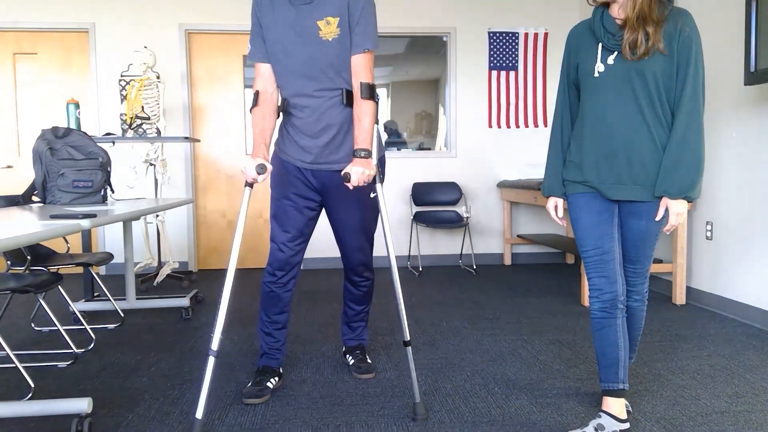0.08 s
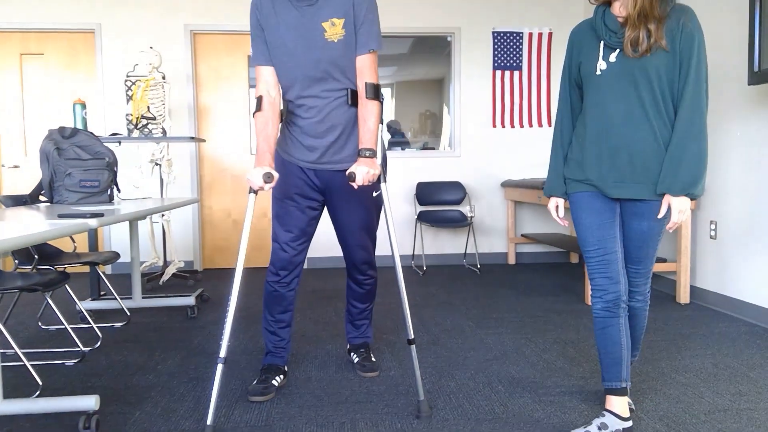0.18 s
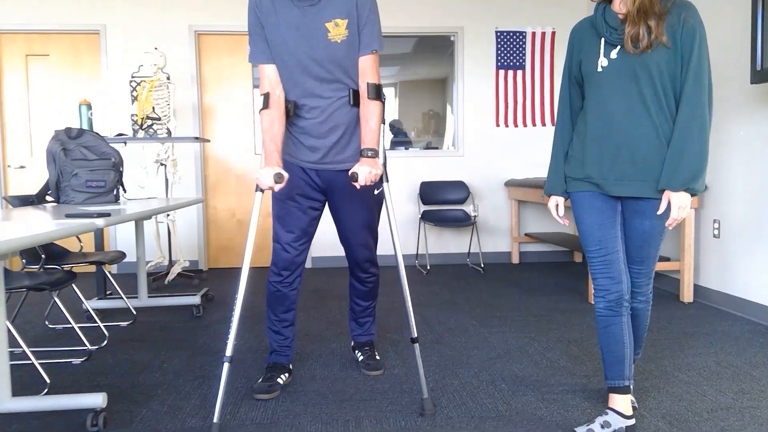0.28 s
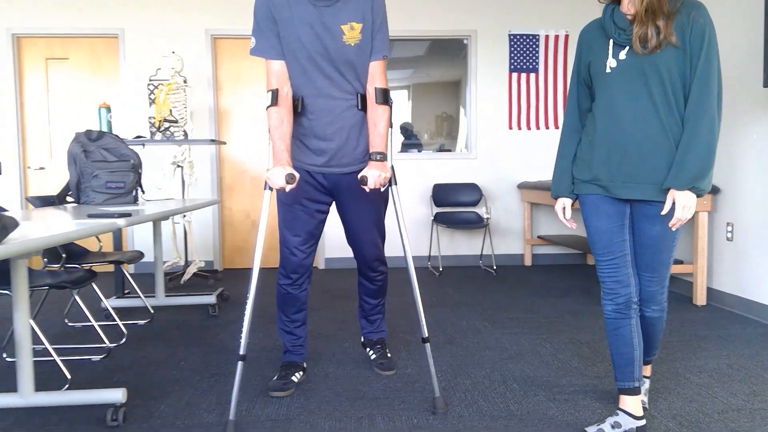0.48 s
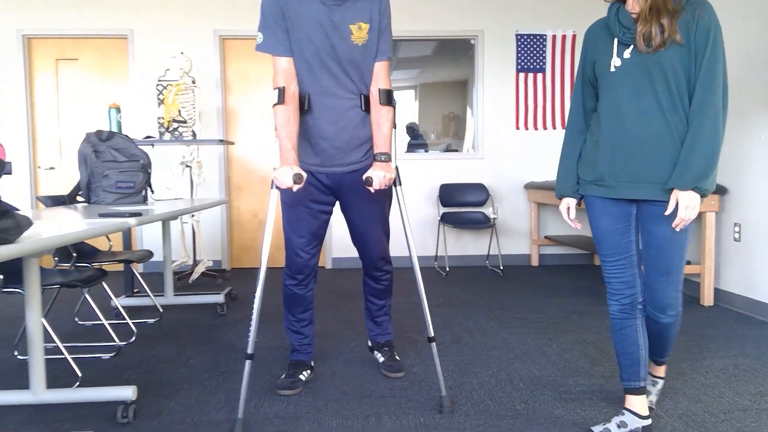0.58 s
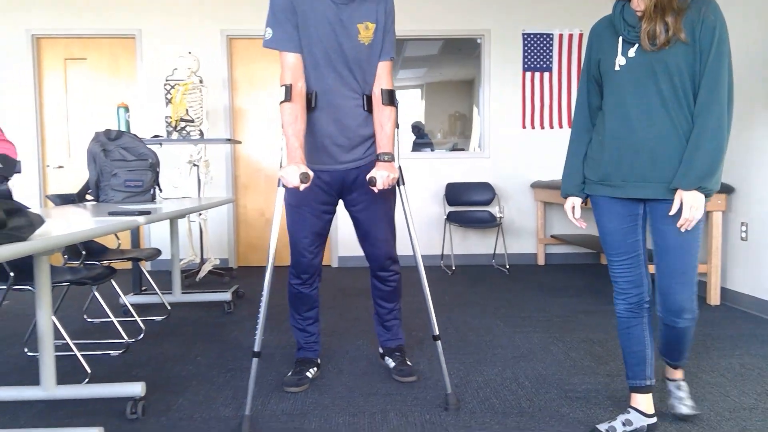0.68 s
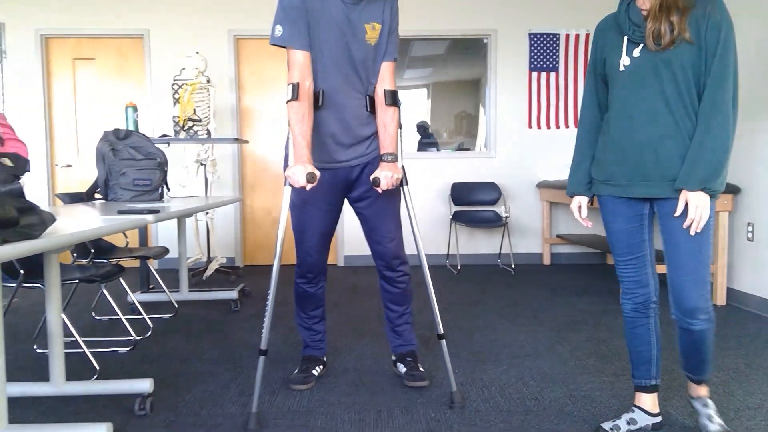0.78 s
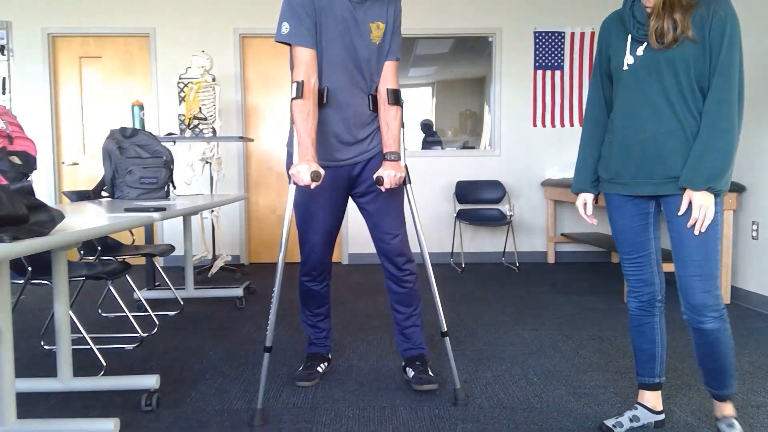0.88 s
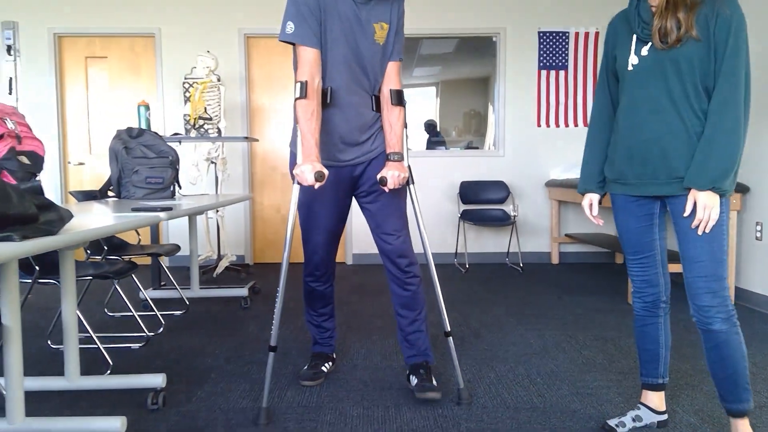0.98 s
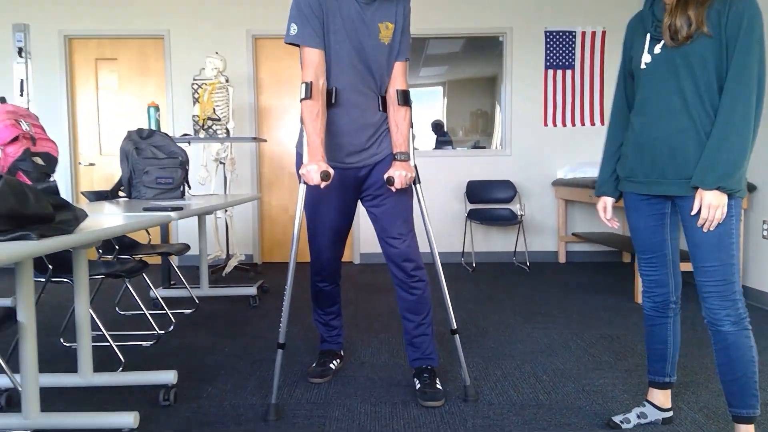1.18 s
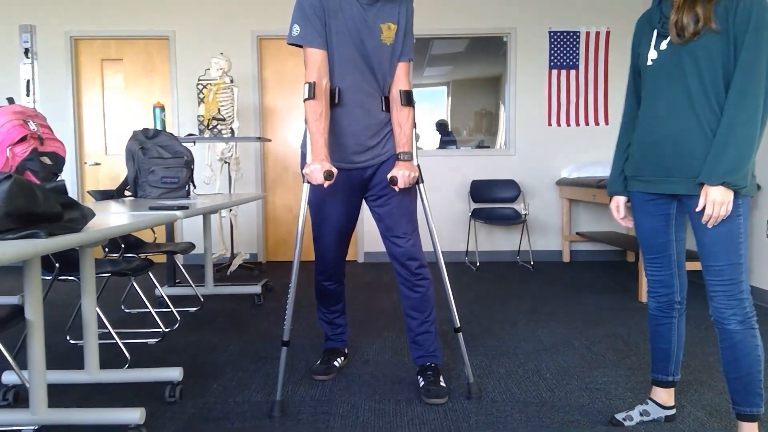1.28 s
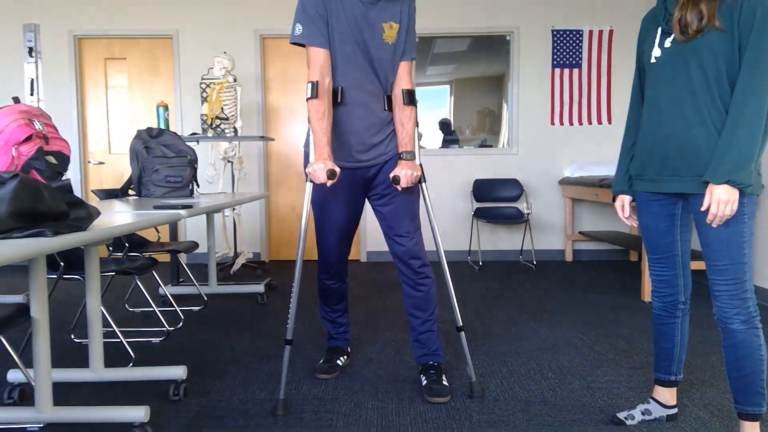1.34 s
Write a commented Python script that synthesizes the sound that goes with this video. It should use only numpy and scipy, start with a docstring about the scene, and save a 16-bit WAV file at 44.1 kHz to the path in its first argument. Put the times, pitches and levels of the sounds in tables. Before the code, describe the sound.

Aluminium crutch takes weight with a sharp ringing clack, followed by a squeak, ticks and cloth rustle

```python
"""Someone shifts on aluminium forearm crutches in a carpeted room, a little right of the microphone.
Low rumble, hiss and a thin whine run throughout. A loose fitting ticks and rings (struck modes), then a
crutch takes the weight: clicks and decaying modes make a loud clack that rings its tube and thuds the floor.
Something rubbing gives a short rising squeak (a gliding tone) as foot and cloth brush (shaped noise);
the fitting ticks again with a sliding pip, and more brushes follow.
Filtered noise gives the room's echo of the brushes, ticks, pip, squeak, crack and knock."""
import sys
import numpy as np
from scipy import signal
from scipy.fft import rfft, irfft
from scipy.io import wavfile
from scipy.ndimage import uniform_filter1d

SR = 44100
rng = np.random.default_rng(int(sys.argv[2]) if len(sys.argv) > 2 else 0)


def store_wav(level_fs):
    """Save 16-bit WAV to argv[1]."""
    pcm = np.round(np.clip(np.atleast_2d(level_fs), -1, 1) * 32767)
    wavfile.write(sys.argv[1], SR, pcm.T.astype(np.int16))


N = 61740  # length [samples]

# Pan is left minus right [dB]; negative sits to the right. T60 is the time to fall by 60 dB.
# Steady air noise, relative spectrum: (frequency [Hz], density [dB per Hz])
AIR_COLOUR = [(12, 18.5), (25, -5), (40, -7), (68, -4.5), (100, -15.5), (200, -19.5), (350, -22.5),
              (600, -31), (1100, -38.5), (2500, -40.5), (6000, -44), (12000, -46), (16000, -51)]
AIR_DB, AIR_ALIKE_HZ = -54.5, 488
WHINE_HZ, WHINE_DB = 11820, -85.5

# Room decay: (frequency [Hz], T60 [s])
ROOM_T60 = [(80, .75), (260, .56), (700, .39), (1900, .34), (5000, .3), (8000, .275), (14000, .23)]
ROOM_GAP_S, ROOM_BUILD_S, BASS_BUILD_CYCLES = .0006, .001, 2.2
ROOM_PAN_DB, ROOM_ALIKE_HZ = -2, 665
PORT_LAG_S = .00011  # delay of the left port

# Brushes of foot and cloth: (centre [s], bell width [s], level [dB], resonance at centre [Hz],
# resonance re hiss [dB], bass re hiss [dB], pan [dB])
BRUSHES = [(0.582, 0.03, -79, 4200, -2, 8.5, -6), (0.663, 0.031, -78.5, 2550, 0, 9.5, -1),
           (1.08, 0.024, -78, 1840, -2, -42, -16.5), (1.126, 0.021, -71.5, 1608, 1, -3, -12),
           (1.37, 0.027, -102, 1620, -3.5, 16, -11)]
# Colour of the brush hiss: (frequency [Hz], level [dB])
BRUSH_HISS = [(300, -41), (1000, -2), (1500, 10.5), (3200, 7.5), (5500, 2), (9000, -11.5), (15500, -15)]
# Colour of the brush's low body: (frequency [Hz], level [dB])
BRUSH_BASS = [(60, -11), (200, 10.5), (550, 7.5), (1000, -2), (2000, -43)]
BRUSH_WIDTH_HZ, BRUSH_SAG_PER_S = 550, 3.5
BRUSH_GRAIN_DB, BRUSH_ROOM_DB = 2, -6

# Light ticks of a loose fitting: (time [s], base level [dB], click re base [dB], pan [dB],
# room send [dB], treble tilt of the ring [dB per octave], free ring [s])
TICKS = [(.001, -58.5, 13.5, -11, 1.5, -1.5, 0.13), (.856, -60.5, 15.5, -3, -12, -12, 0.071)]
# Ring of the fitting: (frequency [Hz], level re tick base before tilt [dB], T60 [s], pan re tick [dB])
FITTING_MODES = [(3690, -5.5, .26, 15.5), (3900, -7.5, .13, -6.5), (3750, -6, .14, -9),
                 (6438, -5, 0.19, -5), (6860, -2.5, .23, 8), (6680, 0, 0.11, -14.5)]
# Colour of a fitting click: (frequency [Hz], level [dB])
FITTING_CLICK = [(300, -23.5), (2000, -14.5), (3200, 2), (7000, 4.5), (10000, -3), (15500, -10)]
TICK_BOUNCE_S, TICK_BOUNCE_DB, FITTING_MUTE_S = .0045, -.5, .008
CLICK_ROOM_DB, FITTING_ROOM_DB = 11.5, -1.5  # added to each tick's room send
SLIDE_S, SLIDE_WIDTH_S, SLIDE_HZ = .8575, .0045, 3380
SLIDE_DB, SLIDE_PAN_DB, SLIDE_ROOM_DB = -62, -20, -11

# Path of the squeak: (time [s], pitch before jitter [Hz], level before flutter [dB])
SQUEAK_PATH = [(.53, 520, -78), (.565, 800, -68), (.585, 1080, -71), (.593, 1195, -49), (.6, 1215, -43),
               (.607, 1265, -51), (.619, 1510, -53), (.635, 1680, -56), (.649, 1900, -53),
               (.667, 2060, -54), (.68, 2120, -75)]
# Nearby tables and walls return the squeak: (delay [s], level [dB], pan [dB])
SQUEAK_ECHOES = [(.011, -7.5, -3.5), (0.02, -15.5, -9.5), (.034, -15, -12)]
SQUEAK_JITTER = .02  # spread as a fraction of the pitch
SQUEAK_FLUTTER_DB, SQUEAK_PAN_DB, SQUEAK_ROOM_DB = -3, -11, -5
SQUEAK_RESONANCE_HZ, SQUEAK_RESONANCE_WIDTH_HZ, SQUEAK_THIRD_DB = 5650, 217, -15.5

CLACK_S = .2269
# Contacts as the joint seats: (delay [s], level before crack trim [dB])
CONTACTS = [(0, -14.5), (.0008, -2), (.0016, 1), (.0055, -7), (.0094, 1), (.0102, -6.5)]
# Colour of one contact, before radiation: (frequency [Hz], level [dB])
CRACK_COLOUR = [(60, -21.5), (180, -8.5), (330, -3.5), (560, -2.5), (800, -0.5), (1100, -19.5),
                (1550, -5.5), (2050, 1.5), (2700, -6.5), (3300, -2.5), (4800, -10.5), (6500, -4),
                (7800, -4.5), (9500, -11.5), (12000, -10.5), (15500, -13)]
CRACK_DB, CRACK_PAN_DB, CRACK_ROOM_DB = -2, -13.5, 12.5
# Knock of the telescoping joint: (frequency [Hz], level before radiation [dB], T60 [s])
KNOCK_MODES = [(820.5, -27.5, .035), (1259, -17, 0.019), (2777, -17.5, 0.01), (4030, -26, 0.0071),
               (4424, -20, 0.013), (5750, -21, .009), (6410, -28, 0.022)]
KNOCK_RISE_S, KNOCK_PAN_DB, KNOCK_ROOM_DB = .00074, -10, -5.5
# Ring of the tube: (frequency [Hz], level before tube trim [dB], T60 [s], pan [dB])
TUBE_MODES = [(325, -48, .35, -1), (764, -44, .25, 0), (822, -35, .24, -3), (1010, -40, .24, -1),
              (1240, -41, .18, -3), (1385, -40, .15, -5), (1763, -43, .22, -1), (1878, -43, .25, -4),
              (1945, -37, .45, -3), (1982, -40, .36, -2), (2043, -33, .27, -2), (2530, -40, .2, 0),
              (2627, -37, .2, -5), (2716, -40, .2, -3), (3689, -39, .27, 1), (6415, -41, .18, -8)]
TUBE_DB, TUBE_FREE_S, TUBE_MUTE_S = 1, .225, .04
BLUR_RATE_HZ, BLUR_PHASE_RAD, BLUR_DB = 80, .4, 2  # wobble of the long rings
# The band that the thin tube sends straight to the microphone
RADIATE_LOW_HZ, RADIATE_HIGH_HZ = 482, 8900
# Floor boards under the blow: (frequency [Hz], level before slow onset [dB], T60 [s])
FLOOR_MODES = [(34.08, -42, 0.92), (69.8, -39.5, .7), (111.6, -53, 1)]
FLOOR_RISE_S = .036

TOP_HZ = 15900


def undb(db):
    """Decibels to gain."""
    return 10 ** (np.asarray(db) / 20)


def unit(x):
    """Scale to an rms of one."""
    return x / np.sqrt(np.mean(x ** 2))


def since(start_s):
    """Seconds since a moment, zero before it."""
    return np.maximum(np.arange(N) / SR - start_s, 0)


def decay(age, t60):
    """Exponential fall of 60 dB in the time t60."""
    return np.exp(-np.log(1000) * age / t60)


def soft_onset(age, rise_s):
    """Smooth rise from silence to full level."""
    return 1 - np.exp(-(age / rise_s) ** 2)


def swell(centre_s, width_s):
    """A bell-shaped rise and fall."""
    return np.exp(-.5 * ((np.arange(N) / SR - centre_s) / width_s) ** 2)


def on_log(hz, points):
    """Read a (frequency, value) table on a log-frequency axis."""
    f, v = np.array(points, float).T
    return np.interp(np.log(np.maximum(hz, 1)), np.log(f), v)


def noise(colour):
    """Noise with the given colour and an rms of one."""
    gain = undb(on_log(np.fft.rfftfreq(N, 1 / SR), colour))
    return unit(irfft(rfft(rng.standard_normal(N)) * gain, N))


def waver(rate):
    """A smooth random wobble of spread one: noise averaged twice over 1 / rate seconds."""
    count = int(SR / rate)
    once = uniform_filter1d(rng.standard_normal(N), count)
    return unit(uniform_filter1d(once, count))


def diffuse(alike_hz):
    """Spectra of left and right white noise, mostly alike in the bass and unrelated in the treble."""
    mid, side = rfft(rng.standard_normal((2, N)))
    alike = .9 / (1 + (np.fft.rfftfreq(N, 1 / SR) / alike_hz) ** 2)
    opposite = np.array([[1], [-1]]) * side
    return mid * np.sqrt((1 + alike) / 2) + opposite * np.sqrt((1 - alike) / 2)


def click(start_s, colour, size=2048):
    """A sharp click with the given colour; folding its cepstrum packs the energy after the start."""
    cepstrum = irfft(np.log(undb(on_log(np.fft.rfftfreq(size, 1 / SR), colour))))
    cepstrum[1:size // 2] *= 2
    cepstrum[size // 2 + 1:] = 0
    pulse = irfft(np.exp(rfft(cepstrum)))
    return np.concatenate([np.zeros(max(int(start_s * SR), 0)), pulse, np.zeros(N)])[:N]


def ring(start_s, hz, db, t60, blurred=False):
    """One struck mode dies away; when blurred it wobbles in phase and level."""
    age = since(start_s)
    phase = 2 * np.pi * hz * age
    if blurred:
        phase = phase + BLUR_PHASE_RAD * waver(BLUR_RATE_HZ)
        db = db + BLUR_DB * waver(BLUR_RATE_HZ)
    return (age > 0) * undb(db) * np.sin(phase) * decay(age, t60)


def place(x, pan_db):
    """Direct sound from the right: the left port hears it slightly later."""
    left = np.concatenate([np.zeros(int(abs(PORT_LAG_S) * SR)), x])[:N]
    return np.array([left * undb(pan_db / 2), x * undb(-pan_db / 2)])


def background():
    """Ventilation rumble and faint hiss as coloured noise, with a thin electrical whine as a steady tone."""
    hz = np.fft.rfftfreq(N, 1 / SR)
    spectrum = diffuse(AIR_ALIKE_HZ) * undb(on_log(hz, AIR_COLOUR)) * (hz > 10)
    air = unit(irfft(spectrum, N))
    whine = unit(np.sin(2 * np.pi * WHINE_HZ * since(0)))
    return undb(AIR_DB) * air + undb(WHINE_DB) * whine


def room_response():
    """Diffuse reflections in octave bands; the bass builds slowest and lasts longest."""
    centres = 31.25 * 2 ** np.arange(10)
    field, age, out = diffuse(ROOM_ALIKE_HZ), since(ROOM_GAP_S), 0
    for hz in centres:
        share = on_log(np.fft.rfftfreq(N, 1 / SR), list(zip(centres, centres == hz)))
        build = 1 - np.exp(-age / (ROOM_BUILD_S + BASS_BUILD_CYCLES / hz))
        out = out + irfft(field * share, N) * build * decay(age, on_log(hz, ROOM_T60))
    pan = undb(np.array([[ROOM_PAN_DB], [-ROOM_PAN_DB]]) / 2)
    return unit(out) / np.sqrt(N) * pan


def echo(x, room, db):
    """What the room returns of a sound."""
    return undb(db) * signal.fftconvolve(x[None], room, axes=1)[:, :N]


def brushes(room):
    """Fibres rub: grainy hiss with a soft low body and one resonance that falls as the stroke slows."""
    out = 0
    for centre, width, db, hz, peak_db, bass_db, pan_db in BRUSHES:
        falling_hz = hz * (1 - np.tanh(BRUSH_SAG_PER_S * (since(0) - centre)))
        phase = 2 * np.pi * np.cumsum(falling_hz) / SR
        # two slow noises on a carrier make a narrow band of noise
        peak = unit(waver(BRUSH_WIDTH_HZ) * np.cos(phase) + waver(BRUSH_WIDTH_HZ) * np.sin(phase))
        rub = noise(BRUSH_HISS) + undb(peak_db) * peak + undb(bass_db) * noise(BRUSH_BASS)
        grain_db = BRUSH_GRAIN_DB * waver(390)
        rub = rub * undb(db + grain_db) * swell(centre, width)
        out = out + place(rub, pan_db) + echo(rub, room, BRUSH_ROOM_DB)
    return out


def fitting_slide(room):
    """A small metal fitting slides with a brief pip of steady pitch."""
    slide = undb(SLIDE_DB) * swell(SLIDE_S, SLIDE_WIDTH_S) * np.sin(2 * np.pi * SLIDE_HZ * since(0))
    return place(slide, SLIDE_PAN_DB) + echo(slide, room, SLIDE_ROOM_DB)


def ticks(room):
    """A small metal fitting clicks, bounces once and rings until it is pressed still."""
    out = 0
    for start, db, click_db, pan_db, room_db, treble_db, free_s in TICKS:
        bounce = undb(TICK_BOUNCE_DB) * click(start + TICK_BOUNCE_S, FITTING_CLICK)
        contact = undb(db + click_db) * (click(start, FITTING_CLICK) + bounce)
        out = out + place(contact, pan_db) + echo(contact, room, room_db + CLICK_ROOM_DB)
        free = np.exp(-since(start + free_s) / FITTING_MUTE_S)
        for hz, mode_db, t60, mode_pan_db in FITTING_MODES:
            tilt_db = treble_db * np.log2(hz / FITTING_MODES[0][0])  # pivots on the first mode
            mode = free * ring(start, hz, db + mode_db + tilt_db, t60, blurred=True)
            out = out + place(mode, pan_db + mode_pan_db)
            out = out + echo(mode, room, room_db + FITTING_ROOM_DB)
    return out


def squeak(room):
    """A rubbing contact sings roughly and climbs; its third harmonic sweeps through a resonance."""
    t = since(0)
    times, hz, db = np.array(SQUEAK_PATH).T
    pitch = np.interp(t, times, hz) * (1 + SQUEAK_JITTER * waver(360))
    phase = 2 * np.pi * np.cumsum(pitch) / SR
    resonance = signal.iirpeak(SQUEAK_RESONANCE_HZ, SQUEAK_RESONANCE_HZ / SQUEAK_RESONANCE_WIDTH_HZ, SR)
    third = signal.lfilter(*resonance, np.sin(3 * phase))
    level_db = np.interp(t, times, db, left=-np.inf, right=-np.inf)  # silent outside the path
    flutter_db = SQUEAK_FLUTTER_DB * waver(380)
    tone = (np.sin(phase) + undb(SQUEAK_THIRD_DB) * third) * undb(level_db + flutter_db)
    early = 0
    for delay, echo_db, pan_db in SQUEAK_ECHOES:
        early = early + place(undb(echo_db) * np.interp(t - delay, t, tone), pan_db)
    # the room holds each pitch under the next
    return place(tone, SQUEAK_PAN_DB) + early + echo(tone, room, SQUEAK_ROOM_DB)


def radiate(x):
    """The thin tube radiates little bass and beams its top treble away."""
    band = [RADIATE_LOW_HZ, RADIATE_HIGH_HZ]
    return signal.sosfilt(signal.butter(2, band, "band", fs=SR, output="sos"), x)


def joint_crack():
    """The joint slams home in a few sharp contacts."""
    return sum(undb(CRACK_DB + db) * click(CLACK_S + delay, CRACK_COLOUR) for delay, db in CONTACTS)


def joint_knock():
    """The blow excites short modes of the joint, heard through the tube's radiation."""
    modes = sum(ring(CLACK_S, hz, db, t60) for hz, db, t60 in KNOCK_MODES)
    return radiate(modes * soft_onset(since(CLACK_S), KNOCK_RISE_S))


def tube_ring():
    """The tube's modes ring on until the grip damps them."""
    out = 0
    for hz, db, t60, pan_db in TUBE_MODES:
        start = CLACK_S + rng.random() / hz  # random start within one cycle
        out = out + place(ring(start, hz, TUBE_DB + db, t60, blurred=True), pan_db)
    return out * np.exp(-since(CLACK_S + TUBE_FREE_S) / TUBE_MUTE_S)


def floor_thud():
    """The blow shakes the floor boards, whose low modes swell up slowly."""
    modes = sum(ring(CLACK_S, hz, db, t60) for hz, db, t60 in FLOOR_MODES)
    return modes * soft_onset(since(CLACK_S), FLOOR_RISE_S)


def clack(room):
    """The crutch takes the weight: crack, knock, tube ring and floor thud; the room answers crack and knock."""
    knock = joint_knock()
    direct = place(radiate(joint_crack()), CRACK_PAN_DB) + place(knock, KNOCK_PAN_DB)
    direct = direct + tube_ring() + floor_thud()
    # the room hears one contact in its full colour
    crack_echo = echo(click(CLACK_S, CRACK_COLOUR), room, CRACK_DB + CRACK_ROOM_DB)
    return direct + crack_echo + echo(knock, room, KNOCK_ROOM_DB)


def scene():
    """All sources in one room."""
    room = room_response()
    fitting = fitting_slide(room) + ticks(room)
    return background() + brushes(room) + fitting + squeak(room) + clack(room)


def record(dry):
    """The recorder cuts the top with a steep low-pass."""
    return signal.sosfilt(signal.ellip(8, .2, 70, TOP_HZ, fs=SR, output="sos"), dry)


dry = scene()
out = record(dry)
store_wav(out)
```